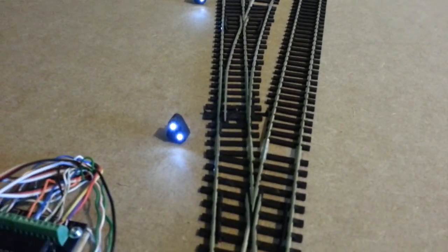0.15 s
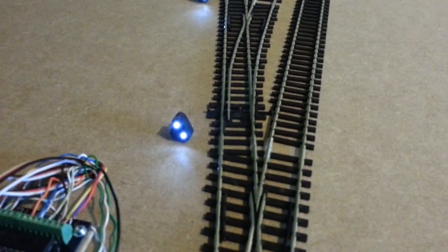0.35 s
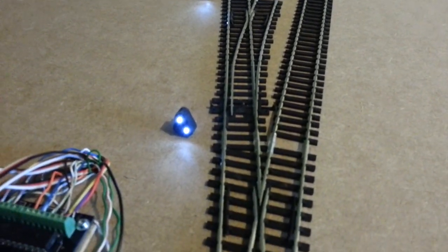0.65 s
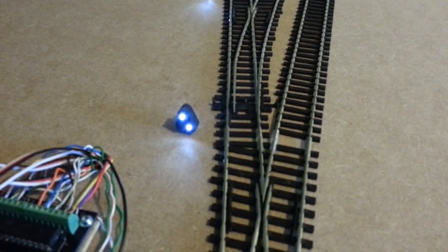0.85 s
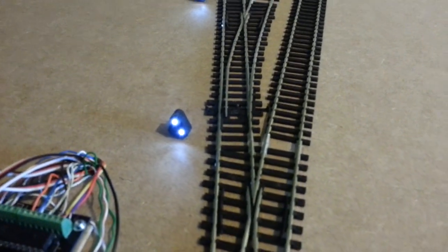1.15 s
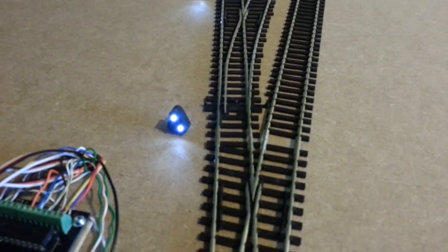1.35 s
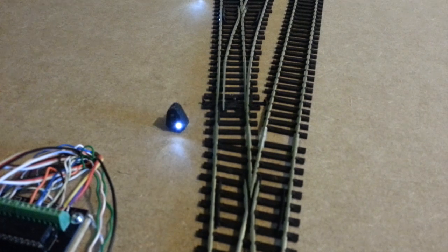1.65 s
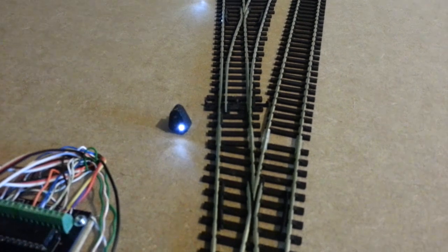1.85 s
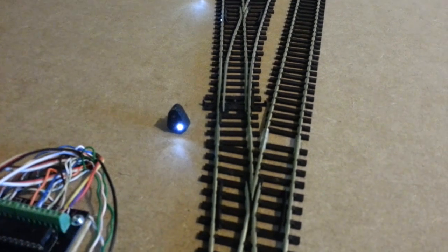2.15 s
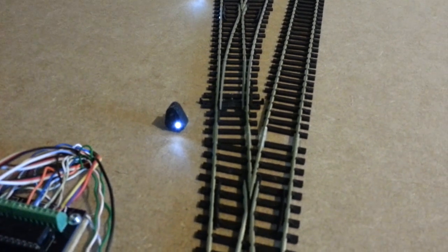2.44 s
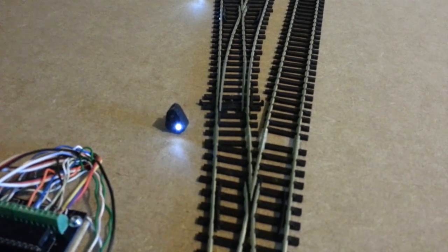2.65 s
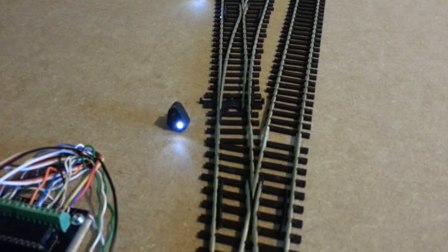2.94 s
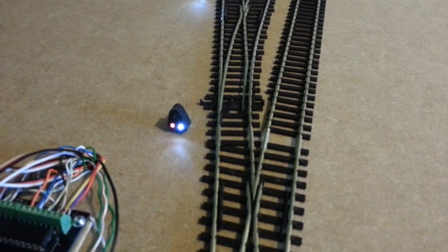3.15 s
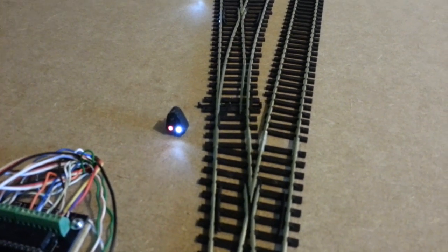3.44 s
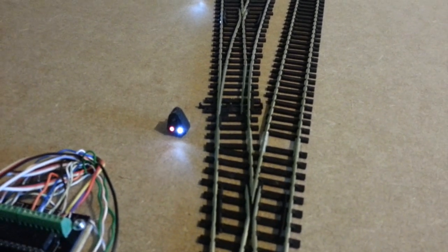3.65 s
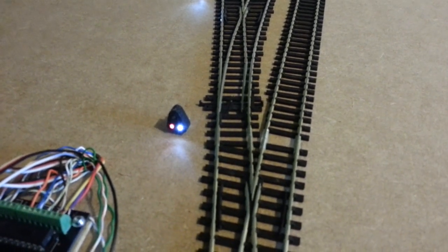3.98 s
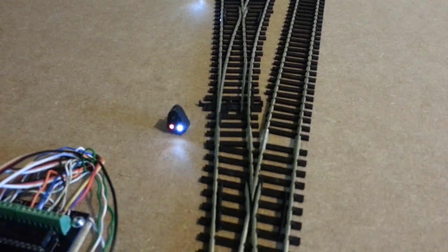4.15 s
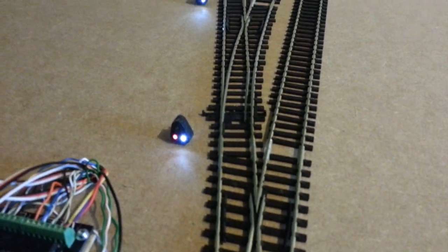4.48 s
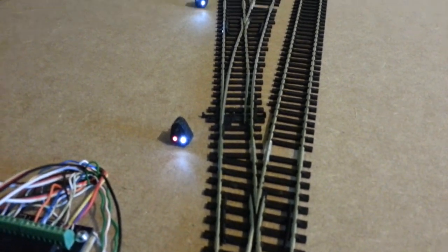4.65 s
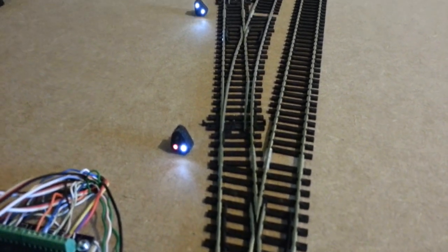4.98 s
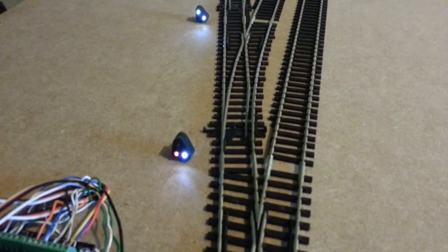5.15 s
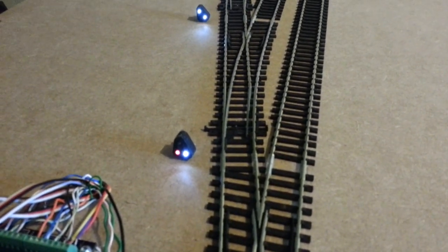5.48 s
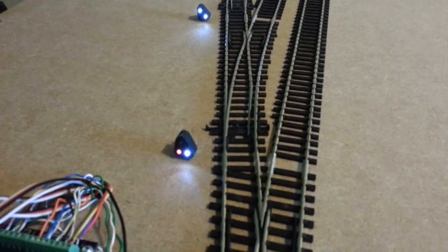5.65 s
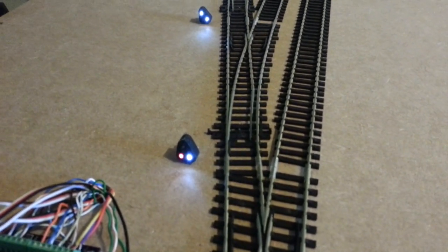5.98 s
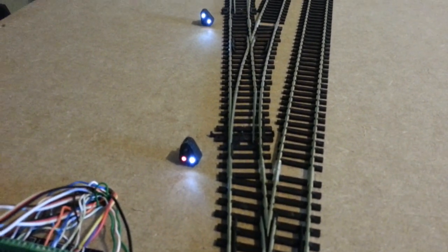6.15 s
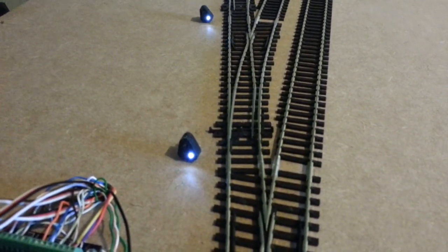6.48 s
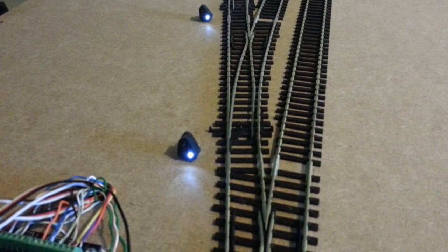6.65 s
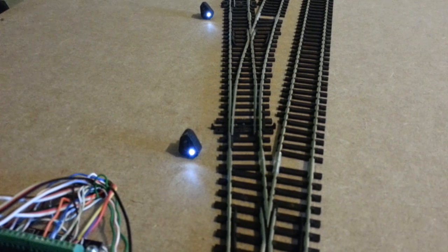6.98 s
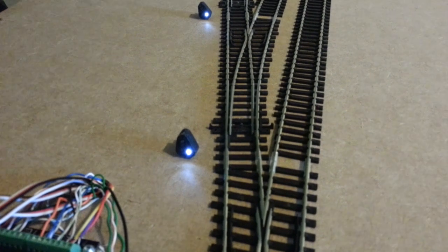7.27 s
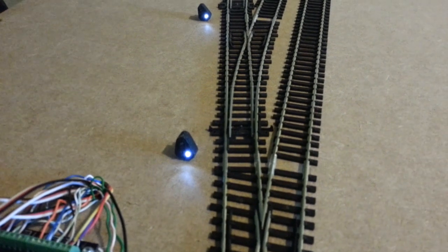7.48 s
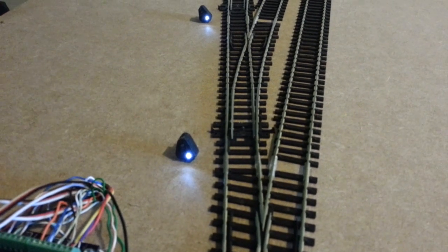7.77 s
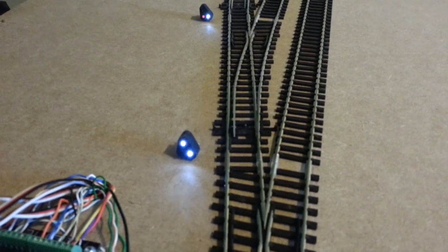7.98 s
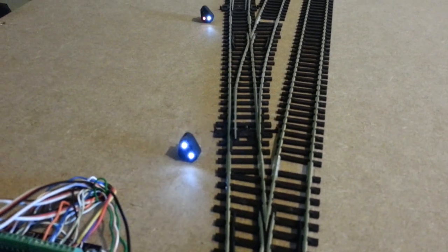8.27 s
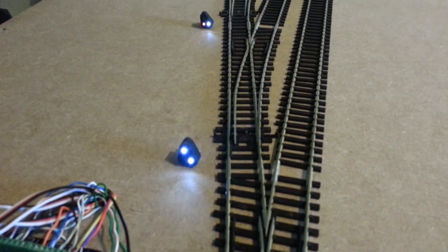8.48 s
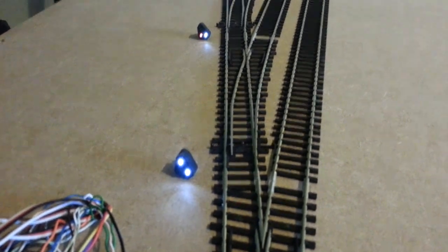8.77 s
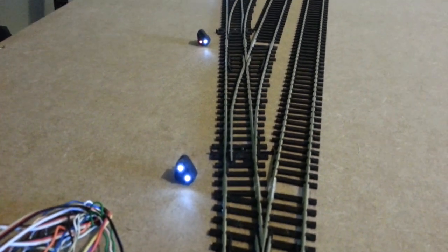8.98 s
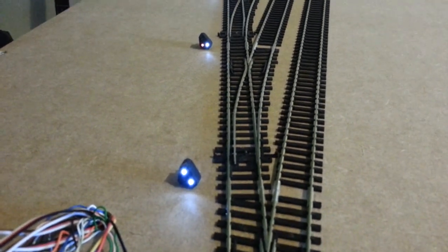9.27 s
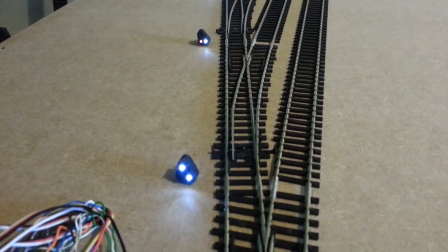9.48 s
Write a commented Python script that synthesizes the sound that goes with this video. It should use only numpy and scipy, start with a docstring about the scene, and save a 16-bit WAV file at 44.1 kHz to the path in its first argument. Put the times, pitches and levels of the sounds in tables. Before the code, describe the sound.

Close above a model railway board in a small room, a faint fan hum and hiss run throughout. From the start, small hobby servos tick in a light, rapid buzz with tiny gaps. At about 1.4 seconds two soft knocks sound in the baseboard as the servos move the points with a louder, uneven rattle of plastic gears, lasting until about 3 seconds. They then buzz more quietly, pressing against the rail, with a few short twitches, the sharpest at about 5 seconds. At about 6.2 seconds come two more soft knocks, and the gears rattle again as the points move back, running down by about 7.8 seconds. The light ticking buzz returns and continues to the end, at around 9.5 seconds. At about 8.6 seconds there is a quick cluster of dry clicks, followed by a short, fading rustle.

```python
"""In a small room, close above a model railway baseboard, hobby servos throw a set of points over and back.
Control pulses, 51 a second, excite the resonances of their plastic cases: at rest the motors tick,
pressed against the rail they buzz, and on the move their gear teeth collide in a rattle.
Two soft knocks ring the board at each throw, and a fan hums throughout over a faint hiss.
A few dry clicks and a short rustle come near the end."""
import sys
import numpy as np
from scipy import signal
from scipy.fft import rfft, irfft, next_fast_len
from scipy.io import wavfile
from scipy.ndimage import uniform_filter1d, map_coordinates

SR = 44100
rng = np.random.default_rng(int(sys.argv[2]) if len(sys.argv) > 2 else 0)


def master(y):
    """Save y as 16-bit WAV."""
    cut = np.clip(np.atleast_2d(y).T, -1, 1)
    pcm = np.round(cut * 32767)  # scale
    wavfile.write(sys.argv[1], SR, pcm.astype(np.int16))


N = 424241

# The fan's tones. Each row: frequency in Hz, level in dB.
FAN_TONES = [(120, -79), (145.3, -72.5), (181, -72.5), (217.4, -69), (274.4, -62), (328.4, -67), (400, -72),
             (549, -74.5), (725.2, -72), (823.4, -65)]
# Spectra of the fan's rush and the hiss. Each row: frequency in Hz, relative level in dB.
FAN_RUSH = [(13, -65), (22, -51), (86, -16.5), (135, -8), (172, -11), (208, -1), (242, -2.5), (271, 0),
            (297, -2), (468, 0), (514, -6), (779, -5), (824, -1.5), (872, -7), (2000, -10), (2600, -9),
            (4400, -120)]
ROOM_HISS = [(880, -10), (1500, 1), (1670, -7.5), (2530, 1), (3650, 3.5), (3950, -2.5), (5160, -6.5),
             (11300, -12), (15900, -12.5)]
# Likeness of the room noise on the two sides. Each row: frequency in Hz, left-right correlation.
CORRELATION = [(30, -0.77), (70, 0.0046), (180, 0.7), (380, 0.67), (700, 0.04), (1300, -0.19),
               (4000, -0.13)]

# Pauses in which the servos are in position and get no drive. Each row: start and end in seconds.
RESTS = [(.09, .15), (.17, .21), (.66, .715), (.75, .772), (.79, .81), (1.32, 1.33), (1.355, 1.37),
         (4.09, 4.112), (5.55, 5.57), (7.935, 7.96), (8.095, 8.11), (8.385, 8.405), (9.2, 9.22)]
# A tick's contacts around its main snap. Each row: lead in seconds, its level in dB, fall-back in
# seconds, its level in dB, chatter level in dB. Levels are relative to the snap.
HOLD_TICK = (.0017, -6, .0024, -4, 4)
PRESS_TICK = (.0024, -3, .0026, -3.5, 7.8)
SETTLED_TICK = (.0012, -5, .001, -6, 5)
# Case spectra before, between and after the throws. Each row: frequency in Hz, relative level in dB.
CASE_FREE = [(400, -41), (1200, -24), (1900, -17), (2300, -14), (2800, -6.5), (3400, .3), (4200, -2),
             (5200, -11.5), (6000, -18), (7000, -17.5), (8500, -35), (15000, -45)]
CASE_LOADED = [(400, -40), (1200, -20.5), (1900, -10.5), (2300, -5.5), (2800, -4.5), (3400, 0),
               (4200, -2.8), (5200, -9.5), (6000, -13.5), (7000, -17), (8500, -29), (15000, -35)]
CASE_SETTLED = [(400, -47), (1200, -14), (2200, -5.5), (2700, -6.5), (3300, 1), (3750, -4), (4400, -8.5),
                (5200, -13), (5750, -13), (6000, -18), (6450, -14.5), (6800, -19), (7500, -25),
                (15000, -45)]
# Narrow peaks and dips of case and gearbox. Each row: frequency in Hz, width in Hz, lift in dB.
CASE_MODES = [(1610, 110, 7), (1886, 120, -12), (2170, 230, 1), (3150, 110, 3), (3380, 220, 3),
              (3760, 200, 4), (4650, 500, 3.5), (5480, 260, 2.5), (6400, 300, 5), (6760, 260, 5),
              (7450, 300, 3)]
GEAR_MODES = [(1600, 150, 7), (3050, 160, 3.5), (3850, 300, 4), (4050, 140, -4), (4480, 300, 3),
              (5450, 200, 3), (5720, 140, -4), (5960, 380, 12), (6400, 420, 7), (6950, 240, 6),
              (7400, 380, 6), (8500, 400, -3), (9200, 200, 1), (10650, 160, 4)]
# Stereo balance of case, gearbox and clicks. Each row: frequency in Hz, left over right in dB.
CASE_LEAN = [(1300, -16), (2400, -3.5), (3300, -0.7), (4000, 1.5), (4700, -1.5), (5400, -4), (6000, -10.5),
             (7000, -12), (8200, 2), (12000, 11)]
GEAR_LEAN = [(1300, -5), (2400, -4), (3300, -1), (4000, 1.5), (4700, -4.5), (5400, -2.5), (6000, -7.5),
             (7000, -12.5), (8200, -4.5), (12000, -1.5)]
CLICK_LEAN = [(2000, 2), (8000, -4)]

# Knocks in the baseboard. Each row: start in seconds, level in dB.
KNOCKS = [(1.4033, -20.5), (1.552, -29), (6.22, -21), (6.3607, -30)]
# The board's response. Each row: frequency in Hz, relative level in dB.
BOARD_SPECTRUM = [(35, -52), (60, -23), (91, -22.5), (242, -1.5), (380, -1.5), (499, -3.5), (678, -26),
                  (804, -42), (900, -51), (1170, -61), (1980, -120)]

# The throws, over and back. Each row: start and end in seconds, step level in dB, step length and
# run-down in seconds, treble over middle in dB of a reference kick at the start and at the end.
THROWS = [(1.44, 3.062, -32.3, 0.0083, 0.02, -1.5, 2.5), (6.26, 7.771, -33.3, 0.01, 0.055, 0.5, 2.5)]
# Surges, where a lagging servo catches up with hard kicks in successive frames.
# Each row: start in seconds, level in dB, kick length in seconds, number of kicks.
SURGES = [(1.439, -22, 0.0036, 1), (1.555, -27, 0.013, 1), (1.573, -23.5, .011, 3),
          (1.710, -25.5, 0.0018, 1), (1.747, -26, 0.015, 1), (1.765, -27, 0.014, 2), (1.806, -28, 0.016, 1),
          (1.923, -29.5, 0.016, 1), (1.962, -27, 0.0099, 2), (2.021, -25, 0.0089, 1), (2.174, -28, .011, 2),
          (2.213, -24, 0.015, 2), (2.273, -22, .0033, 1), (2.293, -23, .003, 1), (2.332, -30.5, .012, 2),
          (2.390, -22.5, 0.0026, 1), (2.411, -23.5, 0.009, 1), (2.523, -27.5, .006, 1),
          (2.565, -23.5, .0061, 1), (2.603, -23.5, 0.011, 1), (2.661, -25.5, 0.0096, 1),
          (2.681, -27.5, 0.0084, 3), (2.757, -31, 0.019, 1), (2.798, -27, 0.01, 2), (2.857, -26.5, 0.01, 1),
          (2.894, -24, 0.011, 1), (2.993, -31, 0.01, 2), (3.029, -25, 0.0089, 1), (3.069, -32, .005, 1),
          (3.187, -35, 0.0065, 3), (4.003, -37, .004, 1), (4.488, -30, 0.005, 1), (4.992, -23.5, 0.0038, 1),
          (5.65, -35, 0.012, 1), (6.255, -26.5, 0.01, 1), (6.274, -26, 0.011, 2), (6.332, -30.5, 0.014, 1),
          (6.372, -27.5, .014, 2), (6.449, -30.5, 0.011, 1), (6.55, -31.5, 0.011, 1),
          (6.589, -31, 0.013, 1), (6.626, -29, 0.011, 2), (6.684, -27.5, 0.0077, 1), (6.78, -31, 0.0091, 1),
          (6.799, -28.5, 0.016, 1), (6.858, -27.5, 0.008, 1), (6.895, -29, 0.013, 3),
          (7.012, -28.5, 0.016, 1), (7.05, -28, 0.011, 1), (7.090, -27, 0.011, 2), (7.286, -24, 0.0041, 1),
          (7.304, -28, 0.014, 3), (7.415, -28, 0.014, 1), (7.461, -30, 0.0074, 1), (7.48, -22.5, 0.0066, 1),
          (7.499, -30, .009, 1), (7.519, -28, .008, 1), (7.595, -29.5, 0.015, 2), (7.696, -23, 0.011, 2),
          (7.733, -29, .011, 3), (7.811, -33, 0.0072, 1), (7.871, -34, .003, 1), (8.14, -41, .008, 1),
          (8.334, -37, 0.0049, 1)]
# Gearbox spectra for the two directions. Each row: frequency in Hz, relative level in dB.
GEARS_OVER = [(400, -52), (1100, -16), (2000, -7.5), (2700, -2), (3500, 5.5), (4700, 2), (5400, -5),
              (7000, -10), (7900, -11), (8900, -12.5), (9800, -25), (12000, -21.5), (15800, -28)]
GEARS_BACK = [(400, -62), (1100, -14.5), (2000, -8.5), (2700, -2.5), (3500, 4.5), (4700, 3.5), (5400, -2.5),
              (7000, -9.5), (7900, -8.5), (8900, -8), (9800, -16), (12000, -20.5), (14000, -18.5),
              (15800, -25)]

# Dry clicks. Each row: start in seconds, level in dB before filtering, length in seconds, cut-off in Hz.
CLICKS = [(8.609, -31.5, .003, 4970), (8.6265, -27.5, 0.0035, 8000), (8.646, -38, .008, 7000),
          (8.667, -29.5, 0.0065, 7540)]
# Spectra of the clicks and the rustle. Each row: frequency in Hz, relative level in dB.
CLICK_SPECTRUM = [(300, -58), (1200, -13), (2200, -11), (3200, 0), (4250, 3), (5300, -4), (6500, 3.5),
                  (8000, -7), (9500, -10), (15000, -21)]
RUSTLE_SPECTRUM = [(400, -58), (1500, -8), (2100, -10), (2500, -5.5), (3150, -4), (4400, -2), (5900, -8),
                   (7450, -16), (15000, -23)]

FRAME_HZ, TOP_HZ = 51.482, 15900  # control pulse rate, upper band limit
HOLD_DB, PRESS_DB, SETTLED_DB = -48.8, -48.8, -49.6  # ticks before, between and after the throws
LANDING_DB, LANDING_S, RELAX_S = 2.8, .2, .2  # an extra push builds as the blades land, then relaxes
EASE_AT_S, EASE_S, EASE_DB = 5.42, .22, 2.5  # the load eases for a moment
HUNT_DB = 1.1  # overshoot against the rail: strong and weak ticks tend to alternate
SPIN_UP_DB, SPIN_UP_S = 5.5, .072  # the first steps are weaker, until the slack is taken up
STEP_SCATTER_DB, STEP_SWAY_DB, STEP_SWAY_HZ = .86, .86, 9  # the load varies along the travel
STICK_DB, STICK_S = 1.8, .025  # the level drops as the blades stick just before a surge
KICK_REFERENCE_DB, KICK_BRIGHTENS = -30, .74  # treble over middle grows by .74 dB per dB above this


def amp(db):
    """Amplitude grows tenfold for every 20 dB."""
    return 10 ** (np.asarray(db) / 20)


def unit(x):
    """Normalisation brings a signal to rms 1."""
    return x / np.sqrt(np.mean(x ** 2) + 1e-20)


def along(points, hz):
    """Interpolation joins (Hz, value) points on a logarithmic frequency axis."""
    f, v = np.transpose(points)
    return np.interp(np.log(hz + 1), np.log(f + 1), v)


def wobble(rate):
    """A spline through random knots, rate a second, gives a smooth fluctuation."""
    knots = rng.standard_normal(int(N * rate / SR) + 4)
    coarse = np.arange(0, N + 64, 64)
    return np.interp(np.arange(N), coarse, map_coordinates(knots, [coarse * rate / SR]))


def drift(times, rate):
    """Sampling a smooth fluctuation gives neighbouring events related values."""
    return np.interp(times, np.arange(N) / SR, wobble(rate))


def filtered(x, response):
    """A linear filter multiplies the spectrum by its frequency response."""
    m = next_fast_len(N + SR // 2)
    return irfft(rfft(x, m) * response(np.fft.rfftfreq(m, 1 / SR)), m)[..., :N]


def minimum_phase(gain):
    """Folding the cepstrum gives the causal response of least delay for a given gain."""
    cepstrum = irfft(np.log(np.maximum(gain, 1e-6)))
    half = cepstrum.shape[-1] // 2
    cepstrum[..., 1:half] *= 2
    cepstrum[..., half + 1:] = 0
    return np.exp(rfft(cepstrum))


def resonance_db(hz, centre, width, lift_db):
    """A resonance lifts the spectrum in a bell around its centre; a negative lift makes a dip."""
    return lift_db / (1 + (2 * (hz - centre) / width) ** 2)


def ring(drive, response):
    """A linear body convolves its drive with its stereo impulse response."""
    return signal.oaconvolve(drive[None], response, axes=1)[:, :N]


def through(drive, path):
    """A path of unit energy colours a broadband drive and conserves its power."""
    return ring(drive, unit(path) / np.sqrt(path.shape[1]))


def air(spectrum):
    """The ratio of mid to side noise sets the left-right correlation at each frequency."""
    def response(hz):
        angle = np.arccos(np.clip(along(CORRELATION, hz), -1, 1)) / 2
        return amp(along(spectrum, hz)) * [np.cos(angle), np.sin(angle)]
    mid, side = filtered(rng.standard_normal((2, N)), response)
    return unit(np.array([mid + side, mid - side]))


def fan():
    """A fan's tones, modulated slightly in level and phase, superpose on rushing air and a faint hiss."""
    t = np.arange(N) / SR
    hum = np.zeros(N)
    for hz, db in FAN_TONES:
        peak = np.sqrt(2) * amp(db + .41 * wobble(6.1))
        hum += peak * np.sin(2 * np.pi * hz * t + .94 * wobble(4))
    rush = amp(-52.5 + .22 * wobble(.99)) * air(FAN_RUSH)
    return hum + rush + amp(-51.3) * air(ROOM_HISS)


def frames(start, end, delay):
    """A periodic control signal times the drive pulses, except during rests."""
    times = np.arange(int(N / SR * FRAME_HZ) + 1) / FRAME_HZ + delay
    resting = np.any([(times > a) & (times < b) for a, b in RESTS], axis=0)
    return times[(times >= start) & (times <= end) & ~resting]


def rattle(times, levels_db, lengths, impacts_hz, rise_share, fall_s, size=1500):
    """Random impacts, as of gear teeth, form a noise burst that decays exponentially after each kick."""
    drive, t = np.zeros(N + SR), np.arange(size) / SR
    for start, db, length in zip(times, levels_db, lengths):
        attack = 1 - np.exp(-t / (rise_share * length))
        swell = attack * np.exp(-np.maximum(t - length, 0) / fall_s - .5 * t / length)
        impacts = rng.standard_normal(size) * (.5 + (rng.random(size) < impacts_hz / SR))
        burst = unit(impacts * swell) * np.sqrt(np.mean(swell ** 2)) / swell.max()
        drive[max(round(start * SR), 0):][:size] += amp(db) * burst
    return drive[:N]


def ticking(times, levels_db, tick, scatter_db=1.1, jitter=.12):
    """Backlash splits a tick into four drives: slack taken up, snap, fall-back and chatter between."""
    lead_s, lead_db, fall_s, fall_db, chatter_db = tick
    chance = rng.standard_normal((len(times), 3))
    db = levels_db + scatter_db * chance[:, 0]
    lead = times - lead_s * np.exp(jitter * chance[:, 1])
    fall = times + fall_s * np.exp(jitter * chance[:, 2])
    contacts = []
    for when, contact_db in ((lead, lead_db), (times, 0), (fall, fall_db)):
        heights = amp(db + contact_db) * np.sqrt(SR / FRAME_HZ)  # a frame's energy in one sample
        contacts.append(np.bincount((np.abs(when) * SR).astype(int), heights, N)[:N])
    chatter = rattle(lead - .001, db + chatter_db, fall - lead, 3500, rise_share=.38, fall_s=.0018)
    return contacts + [chatter]


def holding(start, end, level_db, tick, delay, drift_db=.8):
    """Periodic pulses make an unloaded servo tick lightly while the points lie open."""
    times = frames(start, end, delay)
    return ticking(times, level_db + drift_db * drift(times, rate=18), tick)


def housing(spectrum, modes, lean, size=2048, t60=.008):
    """The dense, damped modes of a plastic body give a short, coloured stereo impulse response."""
    t, hz = np.arange(size) / SR, np.fft.rfftfreq(size, 1 / SR)
    fade = (1 - np.exp(-t / .0006)) * amp(-60 * t / t60)
    paths = rfft(rng.standard_normal((2, size)) * fade)
    ripple = np.sqrt(np.abs(uniform_filter1d(np.abs(paths) ** 2, 3, axis=1)))
    colour_db = along(spectrum, hz) + sum(resonance_db(hz, *mode) for mode in modes)
    lean_db = np.outer([.5, -.5], along(lean, hz))
    return irfft(paths * minimum_phase(amp(colour_db + lean_db) / ripple))


def servo_cases():
    """Outside the throws, each kind of contact excites the case along a transmission path of its own."""
    (leave_s, land_s), (return_s, home_s) = np.array(THROWS)[:, :2]
    pressed = pressing(land_s, return_s - 1 / FRAME_HZ)
    before = holding(0, leave_s, HOLD_DB, HOLD_TICK, delay=.0024)
    after = holding(home_s, N / SR, SETTLED_DB, SETTLED_TICK, delay=.003)
    states = (before, CASE_FREE), (pressed, CASE_LOADED), (after, CASE_SETTLED)
    return sum(through(drive, housing(spectrum, CASE_MODES, CASE_LEAN))
               for drives, spectrum in states for drive in drives)


def board_knocks(size=16384, t60=.36):
    """An impulse excites the baseboard's low resonance, and the room reverberates after it."""
    t, hz = np.arange(size) / SR, np.fft.rfftfreq(size, 1 / SR)
    blows = np.zeros(N)
    for start, db in KNOCKS:
        blows[round(start * SR)] = amp(db)
    echoes = rng.standard_normal(size) + .31 * rng.standard_normal((2, size))
    fade = amp(-60 * t / t60) * (1 - np.exp(-t / .0012))
    paths = amp(-5) * unit(echoes * fade) / np.sqrt(size)
    paths[:, 0] -= 1  # the direct sound
    board = minimum_phase(amp(along(BOARD_SPECTRUM, hz) + resonance_db(hz, 252, width=100, lift_db=4)))
    return ring(blows, irfft(rfft(paths) * board) / np.abs(irfft(board)).max())


def radiate(drive, spectrum, modes, lean, band=None, split_hz=5400):
    """As the place of contact moves, a constant total power shifts among three transmission paths."""
    shares = np.array([wobble(30) for _ in range(3)])
    shares /= np.linalg.norm(shares, axis=0) + 1e-9
    sound = np.zeros((2, N))
    for share in shares:
        path = housing(spectrum, modes, lean)
        if band:  # only the middle or only the treble
            path = signal.sosfilt(signal.butter(8, split_hz, band, fs=SR, output="sos"), path)
        sound += through(drive * share, path)
    return sound


def kicks(surges, fade_db=2.84):
    """A surge decays geometrically, one kick a frame; this gives their times, levels and lengths."""
    return np.transpose([(start + k / FRAME_HZ, db - fade_db * k, length)
                         for start, db, length, count in surges for k in range(round(count))])


def gear_train(throw, surges, spectrum, delay):
    """Tooth impacts sound at every step; harder kicks spin the small gears, which radiate more treble."""
    start, end, level_db, step_s, run_down_s, start_treble_db, end_treble_db = throw
    kick_times, kick_db, kick_lengths = kicks(surges)
    steps = frames(start, end + 2 * run_down_s, delay)
    steps = steps[np.abs(steps[:, None] - kick_times).min(axis=1) > .009]  # a kick replaces a step
    slow_db = SPIN_UP_DB * np.exp((start - steps) / SPIN_UP_S)
    slow_db += 20 * np.log10(np.e) * np.maximum(steps - end, 0) / run_down_s
    load_db = STEP_SWAY_DB * drift(steps, STEP_SWAY_HZ)
    load_db += STEP_SCATTER_DB * rng.standard_normal(len(steps))
    until_kick = kick_times - steps[:, None]
    load_db -= STICK_DB * np.any((until_kick > 0) & (until_kick < STICK_S), axis=1)
    lengths = step_s * np.exp(.41 * rng.standard_normal(len(steps)))
    stepping = rattle(steps, level_db + load_db - slow_db, lengths, 2300, rise_share=.08, fall_s=.0063)
    sound = radiate(stepping, spectrum, GEAR_MODES, GEAR_LEAN)
    bright_db = np.interp(kick_times, [start, end], [start_treble_db, end_treble_db])
    bright_db += KICK_BRIGHTENS * (kick_db - KICK_REFERENCE_DB)
    middle_db = kick_db - 10 * np.log10(1 + amp(bright_db) ** 2)  # middle and treble share the power
    for band, band_db in (("low", middle_db), ("high", middle_db + bright_db)):
        surging = rattle(kick_times - .001, band_db, kick_lengths, 3500, rise_share=.22, fall_s=.0026)
        sound += radiate(surging, spectrum, GEAR_MODES, GEAR_LEAN, band)
    return sound


def pressing(start, end):
    """Against the rail the ticks form a buzz, modulated in amplitude by load and overshoot."""
    times = frames(start, end, delay=.0026)
    since = times - start
    push = np.minimum(since / LANDING_S, 1) * np.exp(-np.maximum(since - LANDING_S, 0) / RELAX_S)
    hunting = (-1) ** np.arange(len(times)) * drift(times, rate=4)
    ease = np.exp(-((times - EASE_AT_S) / EASE_S) ** 2)
    return ticking(times, PRESS_DB + LANDING_DB * push - EASE_DB * ease + HUNT_DB * hunting, PRESS_TICK)


def clicks():
    """Noise bursts a few milliseconds long are heard as dry clicks."""
    drive = np.zeros(N)
    for start, db, length, top_hz in CLICKS:
        click = rattle([start], [db], [length], impacts_hz=2500, rise_share=.4, fall_s=.0015)
        drive += signal.sosfilt(signal.butter(4, top_hz, fs=SR, output="sos"), click)
    return radiate(drive, CLICK_SPECTRUM, [], CLICK_LEAN)


def rustle(level_db=-43.5, decay_s=.24, grains_hz=900):
    """Dense random grains merge into a rustle that decays exponentially from the last click."""
    since = np.arange(N) / SR - CLICKS[-1][0]
    grains = unit(rng.standard_normal(N) * (.22 + (rng.random(N) < grains_hz / SR)))
    fade = (since > 0) * np.exp(-np.abs(since) / decay_s)
    return radiate(amp(level_db) * grains * fade, RUSTLE_SPECTRUM, [], CLICK_LEAN)


def walls(x, t60, absorb_hz, size=11025):
    """Diffuse reflections decay exponentially, dulled by absorption; their pattern varies over time."""
    wet, t = np.zeros((2, N + 2 * size)), np.arange(size) / SR
    fade = amp(-60 * t / t60) * (1 - np.exp(-t / .0034))
    for start in range(0, N, size):
        tail = unit(rng.standard_normal((2, size)) * fade) / np.sqrt(size)
        echo = signal.fftconvolve(x[:, start:start + size], tail, axes=1)
        wet[:, start:start + echo.shape[1]] += echo
    return filtered(wet[:, :N], lambda hz: 1 / np.sqrt(1 + (hz / absorb_hz) ** 4))


def scene():
    """Direct sounds and reflections add by superposition; board and fan lean slightly to the right."""
    surges = np.array(SURGES)
    before_return = surges[:, 0] < THROWS[1][0] - 2 / FRAME_HZ
    gears = gear_train(THROWS[0], surges[before_return], GEARS_OVER, delay=.0003)
    gears += gear_train(THROWS[1], surges[~before_return], GEARS_BACK, delay=.0009)
    buzz = servo_cases()
    clicking = clicks() + rustle()
    echo = walls(amp(-2.8) * buzz + amp(-3.5) * gears + amp(-1.5) * clicking, t60=.19, absorb_hz=5060)
    return buzz + gears + clicking + echo + (board_knocks() + fan()) * amp([[-.6], [.6]])


def record(dry):
    """An ideal low-pass filter removes everything above the band limit."""
    return filtered(dry, lambda hz: hz < TOP_HZ)


dry = scene()
out = record(dry)
master(out)
```